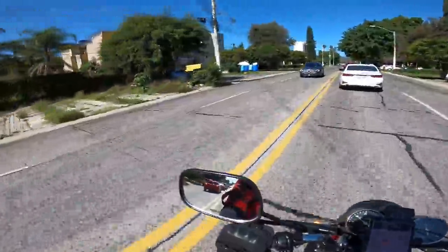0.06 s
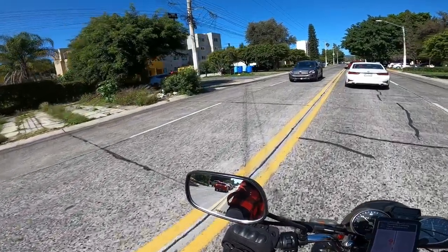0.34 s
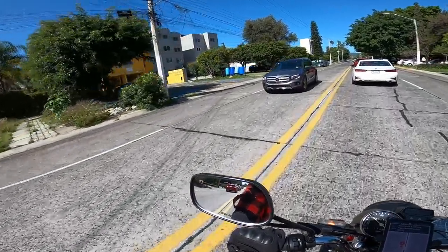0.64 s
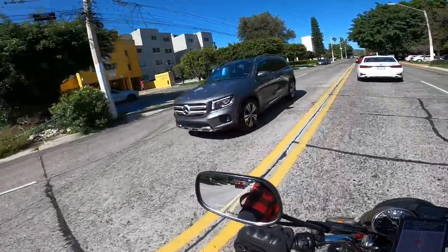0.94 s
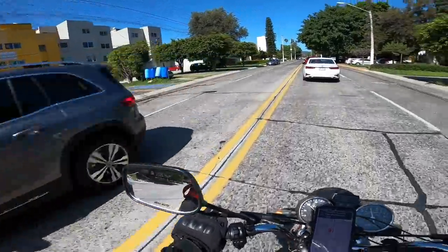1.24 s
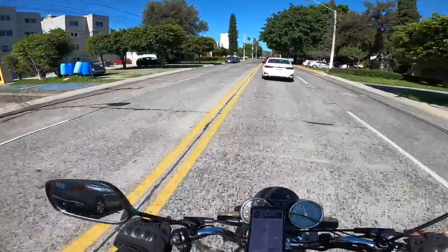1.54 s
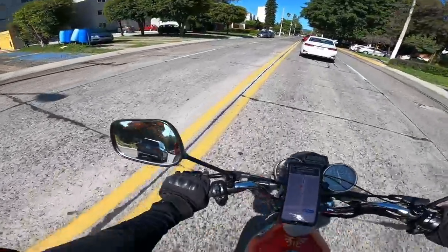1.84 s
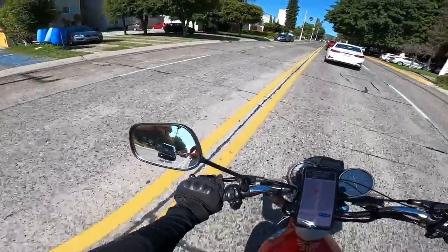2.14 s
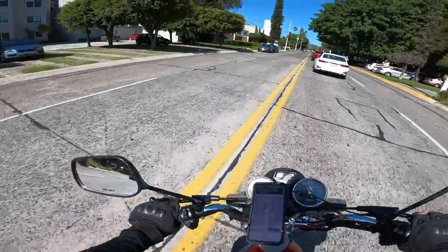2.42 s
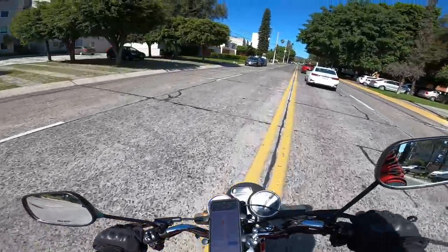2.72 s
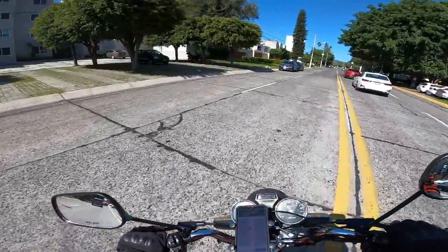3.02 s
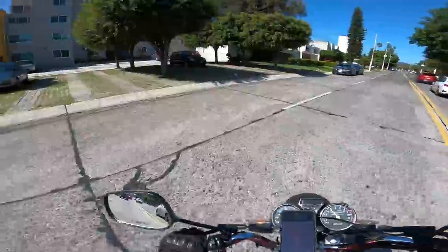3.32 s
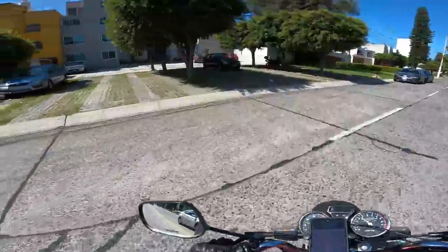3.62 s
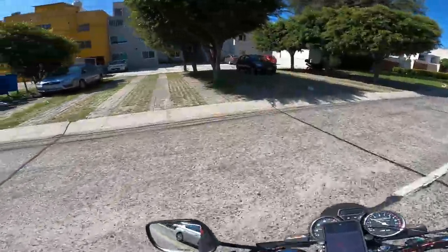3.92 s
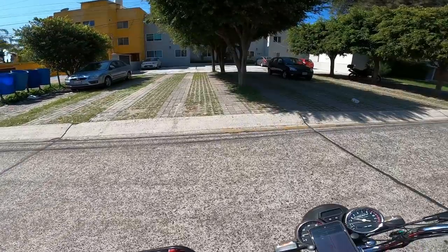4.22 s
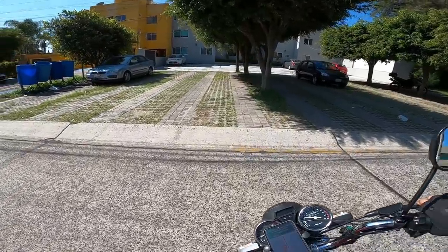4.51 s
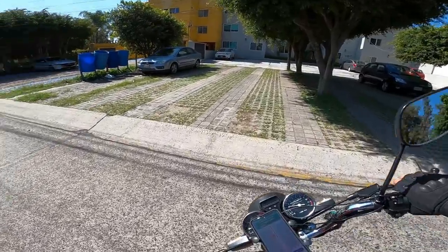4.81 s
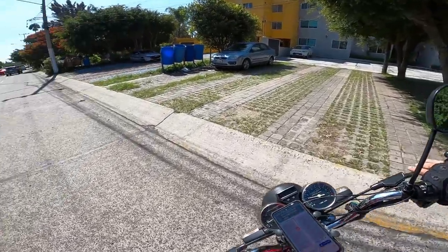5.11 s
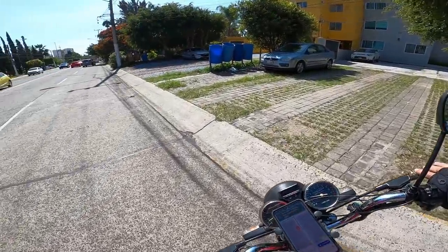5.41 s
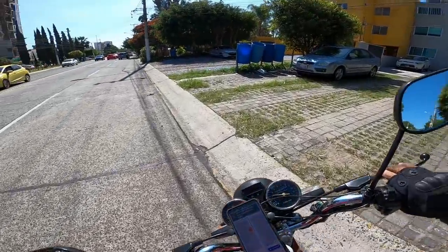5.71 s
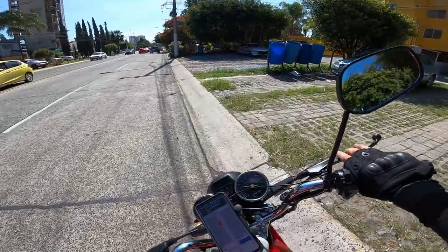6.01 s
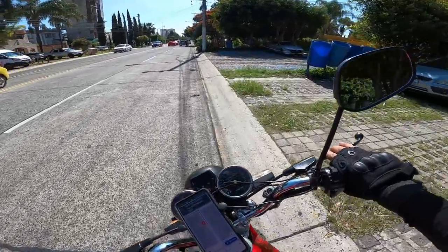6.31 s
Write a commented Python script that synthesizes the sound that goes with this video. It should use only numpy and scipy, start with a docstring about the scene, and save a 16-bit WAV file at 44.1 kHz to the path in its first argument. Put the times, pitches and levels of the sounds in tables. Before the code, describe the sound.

A single-cylinder motorcycle cruises along a street, heard from the rider's seat, with wind buffeting the microphone and tyres roaring and thumping over concrete joints. An oncoming car passes with a slap of air. The throttle shuts and the engine sinks to a slow putting idle, while the brake squeals thinly and faint high chirps come through. The engine then revs up and pulls away at a steady beat.

```python
"""A single-cylinder motorcycle, heard from the rider's seat: each firing booms in the pipe and rings
the silencer. It cruises, an oncoming car's wake slaps the microphone, the throttle shuts and the engine
sinks to idle in a slow U-turn, the brake singing thinly; then it pulls away at a steady beat.
Wind buffets the microphone, the tyres roar on the concrete and thump over its joints,
and thin, high chirps come through in the lull."""
import sys
import numpy as np
from scipy import signal
from scipy.fft import rfft, irfft, next_fast_len
from scipy.io import wavfile
from scipy.ndimage import uniform_filter1d, map_coordinates

SR = 44100
rng = np.random.default_rng(int(sys.argv[2]) if len(sys.argv) > 2 else 0)


def log_audio(samples):
    """Write samples as a 16-bit WAV file to the path given in sys.argv[1]."""
    # one column per channel
    frames = np.atleast_2d(samples).T
    # limit to full scale, then quantise
    limited = np.clip(frames, -1, 1)
    pcm = np.round(limited * 32767).astype(np.int16)
    wavfile.write(sys.argv[1], SR, pcm)


N = 280035
CRUISE_RATE = 39  # firings per second at cruising speed


def boom(cycle, rate, throttle):
    """Each firing pops and sets the gas in the pipe swinging; its note sinks as the gas cools."""
    # the sharp front of each putt: (pitch [Hz], level [dB], decay [s])
    pop_tones = [(257, -19, 0.0039), (475, -23.5, 0.02)]
    heat_lag_s, base_hz, speed_rise_hz, heat_rise_hz = 0.18, 100.9, 38.2, 35.1
    keep = np.exp(-1 / (heat_lag_s * SR))
    heat = throttle[0] + signal.lfilter([1 - keep], [1, -keep], throttle - throttle[0])
    pipe_hz = base_hz + speed_rise_hz * (rate / CRUISE_RATE) ** 2 + heat_rise_hz * heat
    # below full_rate firings a second, the boom weakens until it reaches its idle level
    full_rate, full_db, idle_db = 28.8, -19, -33.5
    boom_db = np.maximum(full_db - 0.94 * np.maximum(full_rate - rate, 0), idle_db) + 8.5 * throttle
    boom_db += 1.5 * (1 - rate / CRUISE_RATE) ** 2 * wobble(27)  # slow putts are more uneven
    muffle_hz = 126.7  # the silencer swallows the boom as its note climbs above this
    muffled_db = 53 * np.maximum(np.log2(pipe_hz / muffle_hz), 0)
    blows = firings(cycle, scatter_db=1.5) * amp(boom_db - muffled_db)
    out, t = np.zeros(N + SR), np.arange(SR // 10) / SR
    swell = t ** 0.86 * np.exp(-t / 0.0084)
    pop = sum(amp(db) * np.exp(-t / decay) * np.sin(2 * np.pi * hz * t) * 2 / np.sqrt(decay * SR)
              for hz, db, decay in pop_tones)
    for i in np.flatnonzero(blows):
        ring = swell * np.sin(2 * np.pi * pipe_hz[i] * t)
        out[i:][:len(t)] += blows[i] * (ring / np.linalg.norm(ring) + pop)
    return out[:N]


def bark(cycle, rate, throttle):
    """Each firing rings the silencer, shakes the panels and spits gas, harder with speed and throttle."""
    # the notes of the silencer and airbox: (pitch [Hz], width [Hz], level [dB])
    silencer_notes = [(200, 22, 2.5), (271.1, 7.3, 10), (319.5, 21.3, 9.5), (431.3, 45, 4.5),
                      (493, 15.4, 3), (535, 13, -7.5), (667, 33, -7.5), (784, 17, -22), (1030, 46, -6),
                      (1304, 90, -16)]
    # the buzz of the panels: (frequency [Hz], level [dB])
    panel_colour = [(150, -14), (350, 5), (600, 4), (900, 7), (1300, -32), (1900, -4), (2400, -18.5),
                    (2900, -13.5), (4200, -17.5), (8000, -32), (15700, -40)]
    # the dry spit of gas: (frequency [Hz], level [dB])
    spit_colour = [(300, -15), (600, 9.5), (1200, -2.5), (2000, -8), (2900, -8.5), (4200, -31), (8000, -43),
                   (15700, -49)]
    bark_db = -34 + 9.5 * octaves(rate / CRUISE_RATE) + 10 * throttle
    blows = firings(cycle, scatter_db=0.7)
    ringing = resonate(blows, silencer_notes)
    silencer = unit(filtered(ringing, lambda hz: 1 / (1 + 1j * hz / 1300) ** 2))  # soften the treble
    # the panels answer every firing alike, so their buzz has a pitch
    t = np.arange(SR // 12) / SR
    answer = rng.standard_normal(len(t)) * np.exp(-t / 0.035) * (1 - np.exp(-t / 0.00085))
    panels = unit(coloured(signal.fftconvolve(blows, answer)[:N], panel_colour))
    spit = noise(spit_colour) * pulses(cycle, rate, delay=0.014, decay=0.004, floor=0.15)
    return amp(bark_db) * (silencer + amp(-8) * panels + amp(-15.5) * spit)


def ticks(cycle, rate, throttle):
    """Every firing starts with a hard tick, louder as the throttle opens."""
    # the tick's tone: (frequency [Hz], level [dB])
    tick_colour = [(900, -15), (1600, -6), (3000, 1), (4200, -17.5), (7000, -18), (15000, -49)]
    edge = pulses(cycle, rate, delay=0.005, decay=0.005, floor=0.02)
    return amp(-75 + 16 * throttle) * edge * noise(tick_colour)


def valve_gear(cycle, rate):
    """Two valves keep the cylinder's fins ringing in a whine, over a pulsing hiss of air drawn into the engine."""
    # the ringing fins: (pitch [Hz], level [dB], pitch scatter [Hz])
    fin_notes = [(3470, 1.5, 58), (3970, -11.5, 19), (4320, -26, 30), (6830, -16, 55), (7750, -23, 45),
                 (9507, -20, 60), (10309, -23, 50)]
    # how their ringing changes: (time [s], level [dB], pitch shift [Hz])
    ring_changes = [(0, -44.5, 0.5), (1.3, -46, -0.5), (1.42, -47.5, -66), (1.75, -47.5, -60),
                    (2.05, -59, -50.5), (3.5, -68, -50.5), (5.3, -78, -52), (5.92, -51.5, -49.5),
                    (6.35, -63, -56)]
    # the hiss near 6 kHz and the finer fizz: (time [s], level [dB])
    hiss_levels = [(0, -53), (.45, -50.5), (.6, -50), (1.3, -48.5), (1.35, -55), (1.55, -55.5), (2.1, -65),
                   (2.5, -52.5), (3.05, -60.5), (3.4, -57), (5.2, -55.5), (5.85, -51), (6.35, -65)]
    fizz_levels = [(0, -48.5), (.8, -50), (1.3, -47), (1.9, -50), (2.5, -49), (3.1, -49.5), (3.7, -58),
                   (4.4, -63), (5.3, -59), (5.6, -49.5), (6.35, -52)]
    # their tone: (frequency [Hz], level [dB])
    hiss_colour = [(4500, -29), (5500, -8), (5850, 5.5), (6080, 2.5), (6450, -5), (7500, -18), (9000, -31)]
    fizz_colour = [(1500, 12.5), (3000, 12.5), (4000, 11.5), (5000, 3), (7300, 5.5), (9000, -3.5),
                   (10500, -2.5), (12200, -10), (13200, -9), (15700, -25)]
    hiss_db, = curves(hiss_levels)
    fizz_db, = curves(fizz_levels)
    ring_db, shift_hz = curves(ring_changes)
    valves = pulses(cycle, rate, delay=0.0065, decay=0.0069, floor=0.7)
    valves += 0.59 * pulses(cycle, rate, delay=0.45, decay=0.0038, floor=0.99)
    fins = sum(amp(db) * tone(hz + shift_hz + scatter * wobble(320)) for hz, db, scatter in fin_notes)
    ring = amp(ring_db) * unit(fins * uniform_filter1d(valves, size=70) ** 1.7)
    depth = (rate / CRUISE_RATE) ** 2  # the pulsing deepens with engine speed
    throb = 1 - depth + depth * pulses(cycle, rate, delay=0.4, decay=0.006, floor=0.67)
    hiss = amp(hiss_db) * noise(hiss_colour) * throb
    fizz = amp(fizz_db) * noise(fizz_colour) * unit(depth * valves + 0.56)
    return ring + (hiss + fizz) * amp(wobble(30))


def brake():
    """The pad on the disc makes a dull rub and one high, fluttering note."""
    # the thin squeal at walking pace: (time [s], pitch [Hz], level [dB])
    squeal_changes = [(3.1, 6100, -72), (3.3, 6090, -56.5), (4.25, 6010, -60.5), (4.45, 5790, -59),
                      (4.72, 5720, -50), (4.93, 6010, -48), (5.1, 6000, -53), (5.3, 6080, -71)]
    hz, db = curves(squeal_changes)
    waver_hz = 65 * wobble(350)
    squeal = amp(db + 4.5 * wobble(70)) * tone(hz + waver_hz)
    pad = [(1100, 310, 0)]  # (pitch [Hz], width [Hz], level [dB])
    rub = unit(resonate(resonate(rng.standard_normal(N), pad), pad))
    return squeal + amp(-42.5) * hump(s=3.73, spread=0.43) * rub


def knocks():
    """Slack in the running gear knocks while the bike coasts."""
    # the small knocks: (time [s], level [dB])
    hits = [(3.5194, -51.5), (3.6597, -48.5), (3.9495, -44), (4.1094, -53), (4.649, -46), (5.0394, -46),
            (5.108, -41.5)]
    # their tone: (frequency [Hz], level [dB])
    knock_colour = [(500, -14), (1500, 3), (3500, -3), (6000, -8), (11000, -20), (15000, -29)]
    strikes = np.zeros(N)
    for s, db in hits:
        age = clock() - s
        strikes += amp(db) * (age > 0) * np.exp(-abs(age) / 0.0098)
    return strikes * noise(knock_colour)


def bumps():
    """Each joint in the road gives the bike's frame one dull thump, never quite the same."""
    # the wheels hit joints in the concrete: (time [s], level [dB])
    joints = [(.692, -19.5), (1.547, -18.5), (1.856, -18), (1.886, -12.5), (2.005, -11.5), (3.185, -14),
              (3.237, -17), (4.501, -25), (4.644, -28), (4.723, -23.5), (4.858, -23), (4.886, -24),
              (4.957, -20.5), (4.991, -24)]
    # the frame's low notes: (pitch [Hz], level [dB], decay [s])
    frame_notes = [(86, 10.5, 0.016), (151, 3.5, 0.015), (236, -3.5, 0.022), (303, -5, 0.0063)]
    out, t = np.zeros(N + SR), np.arange(SR // 8) / SR
    for s, db in joints:
        detunes = np.exp(.08 * rng.standard_normal(len(frame_notes)))
        thump = sum(amp(level) * np.exp(-t / decay) * np.sin(2 * np.pi * hz * detune * t)
                    for (hz, level, decay), detune in zip(frame_notes, detunes))
        out[round(s * SR):][:len(t)] += amp(db) * thump * (1 - np.exp(-t / 0.0042))
    return out[:N]


def tyres(pace):
    """Rubber roars on rough concrete: the bike's own tyres, and the oncoming car's as it passes."""
    # the roar's tone: (frequency [Hz], level [dB])
    roar_colour = [(200, 10), (450, -2.5), (800, 1), (1200, -1.5), (1700, -9.5), (2400, -21), (4000, -29),
                   (9000, -34), (15700, -51)]
    nearest_s, passing_s = 1.2, 0.16
    bike = amp(-35.5 + 2 * octaves(pace))
    car = amp(-29.5) / np.hypot(1, (clock() - nearest_s) / passing_s)
    return np.hypot(bike, car) * amp(1.06 * wobble(25)) * noise(roar_colour)


def wind(pace, intake):
    """Swirls thump the microphone and roughen the rush of air, more so with pace; gusts slap it."""
    # the low thumping and the rushing air: (frequency [Hz], level [dB])
    thump_colour = [(2, -40), (7, 16.5), (15, 8.5), (30, 5.5), (60, 4.5), (100, 1), (170, -6.5), (300, -17)]
    rush_colour = [(60, -67), (160, -2), (280, -3.5), (500, -7), (900, -18), (1600, -24), (2500, -38),
                   (5000, -85), (12000, -62)]
    # swells and lulls in the thumping: (time [s], level change [dB], spread [s])
    swells = [(0.72, 5.5, 0.017), (1.035, 4, 0.042), (1.284, 8.5, 0.046), (1.398, -8, 0.059),
              (3.231, 4.5, 0.073), (4.517, 4.5, 0.023), (4.89, 1.5, 0.08), (5.25, 0.5, 0.16),
              (5.571, 4, 0.031)]
    # slaps of churning air: (time [s], level [dB], spread [s], bright edge [Hz])
    gusts = [(0.695, -17.5, 0.0049, 770), (1.032, -17.5, 0.017, 1690), (1.06, -20.5, 0.016, 1700),
             (1.101, -22.5, 0.017, 915), (1.16, -23, 0.042, 800), (1.285, -20.5, 0.0091, 1200),
             (2.007, -21, 0.002, 1510), (2.037, -21, 0.03, 780), (2.17, -29, 0.12, 1160)]
    buffet_db = -16 + 6 * octaves(pace) + sum(db * hump(s, spread) for s, db, spread in swells)
    rush_db = -32 + 9.5 * octaves(pace) + 13.5 * intake  # the engine sucking in air adds to the rush
    swirls = wobble(35)
    thumps = noise(thump_colour)
    deep = filtered(thumps, lambda hz: 1 / (1 + (hz / 45.7) ** 2))
    buffet = amp(buffet_db + 0.42 * swirls) * (deep + pace * (thumps - deep))  # duller when slow
    rush = amp(rush_db + 1.2 * swirls + 1.8 * wobble(110)) * noise(rush_colour)
    slaps = np.zeros(N)
    for s, db, spread, edge_hz in gusts:
        colour = [(80, -12), (220, 0), (edge_hz, -9), (2 * edge_hz, -25), (5 * edge_hz, -55)]
        slaps += amp(db) * hump(s, spread) * noise(colour)
    return buffet + rush + slaps * amp(1.8 * wobble(140))


def chirps():
    """Short, thin, rising chirps with a ragged pitch, among flurries of fainter ones."""
    # the clearest chirps: (time [s], level before clear_gain_db [dB], pitch [Hz])
    clear_chirps = [(2.4084, -42, 7790), (2.6788, -42, 7560), (2.798, -44, 7680), (2.955, -43.5, 7300),
                    (3.1138, -40.5, 6960), (3.2276, -43, 7640), (3.3777, -44, 7080), (3.5094, -45, 8200),
                    (3.6192, -40, 7890), (3.789, -44, 7790), (3.8985, -42.5, 8270), (4.0557, -38.5, 7510),
                    (4.2094, -41, 6930), (4.335, -41, 7200), (4.4694, -43, 7930), (4.6069, -40.5, 7140),
                    (4.7494, -46, 7210), (4.8778, -43, 7500), (5.024, -44, 6940), (5.1587, -47, 7560),
                    (5.3073, -44, 7000), (5.443, -42, 7370), (5.5694, -40, 6800), (5.7099, -46, 7360)]
    # the flurries: (middle [s], half length [s], top level [dB], lowest [Hz], highest [Hz], chirps [1/s])
    flurries = [(4.15, 1.04, -50.5, 7800, 8500, 24), (4.3, 1.03, -54, 6700, 7300, 46),
                (4.8, 0.49, -55, 4500, 5700, 45), (4.8, 1, -67, 10500, 12300, 47)]
    clear_gain_db, faint_spread_db, typical_length_s = -7, 8, 0.027
    out, t = np.zeros(N + SR), np.arange(SR // 20) / SR
    clear = [(s, db + clear_gain_db, hz) for s, db, hz in clear_chirps]
    faint = [(middle + half * (2 * when - 1), db - faint_spread_db * weak, low + (top - low) * high)
             for middle, half, db, low, top, density in flurries
             for when, weak, high in rng.random(size=(200, 3))[:int(2 * half * density)]]
    for s, db, hz in clear + faint:
        length = typical_length_s * np.exp(.2 * rng.standard_normal())
        ragged = unit(uniform_filter1d(rng.standard_normal(len(t)), size=20))
        pitch = hz * (1 + .025 * (t / length - .5) + .04 * ragged)
        swell = np.sin(np.pi * np.minimum(t / length, 1) ** 0.55)
        out[round(s * SR):][:len(t)] += amp(db) * swell * tone(pitch)
    return out[:N]


def firings(cycle, scatter_db):
    """One blow per engine cycle, each a little different; the average power is about 1 at any speed."""
    at = np.flatnonzero(np.diff(np.floor(cycle)) > 0)
    blows = np.zeros(N)
    blows[at] = amp(scatter_db * rng.standard_normal(512)[:len(at)]) / np.sqrt(np.diff(cycle)[at])
    return blows


def pulses(cycle, rate, delay, decay, floor):
    """A level that jumps `delay` cycles after each firing and falls back over `decay` seconds."""
    age = (cycle - delay) % 1 / rate
    burst = np.exp(-age / decay) * (1 - np.exp(-age / 0.00061))
    return unit(floor + burst / np.sqrt(rate * decay / 2))


def amp(db):
    """Turn decibels into a factor to multiply by."""
    return 10 ** (np.asarray(db) / 20)


def unit(x):
    """Scale x to an average power of 1."""
    return x / np.sqrt(np.mean(x ** 2) + 1e-20)


def octaves(share):
    """How many times a speed has doubled over its cruising value."""
    return np.log2(np.maximum(share, 1e-3))


def clock():
    """The time of every sample, in seconds."""
    return np.arange(N) / SR


def curves(rows):
    """Join a table's points with straight lines: one curve for each column after the time."""
    times, *columns = np.transpose(rows)
    return [np.interp(clock(), times, column) for column in columns]


def hump(s, spread):
    """A smooth swell of height 1 around the time s."""
    return np.exp(-.5 * ((clock() - s) / spread) ** 2)


def wobble(rate):
    """A smooth curve through `rate` random points a second."""
    return map_coordinates(rng.standard_normal(1024), [clock() * rate], mode="mirror")


def tone(hz):
    """A sine wave that follows a changing pitch."""
    return np.sin(2 * np.pi * np.cumsum(hz) / SR)


def noise(colour):
    """Noise of power 1, shaped by (frequency [Hz], level [dB]) points."""
    return unit(coloured(rng.standard_normal(N), colour))


def coloured(x, colour):
    """Shape x by (frequency [Hz], level [dB]) points and cut everything outside them."""
    f, db = np.transpose(colour)
    return filtered(x, lambda hz: amp(np.interp(np.log(hz + 1), np.log(f), db))
                    * (hz > f[0]) * (hz < f[-1]))


def resonate(x, notes):
    """Let x ring a set of (pitch [Hz], width [Hz], level [dB]) notes."""
    return filtered(x, lambda f: sum(amp(db) * 1j * f * width / (hz * hz - f * f + 1j * f * width)
                                     for hz, width, db in notes))


def filtered(x, response):
    """Multiply each frequency in x by response(frequency)."""
    size = next_fast_len(N + SR // 2)
    return irfft(rfft(x, size) * response(np.fft.rfftfreq(size, 1 / SR)), size)[:N]


def scene():
    """Engine speed, throttle and pace drive the bike and the air around it."""
    # engine speed: (time [s], firings [1/s])
    engine_speed = [(0, 38.75), (1.2, 38.9), (1.4, 36.5), (1.75, 37.25), (2.1, 34.7), (2.85, 28.9),
                    (3.1, 24.8), (3.35, 22.1), (4, 10.5), (5.15, 9.9), (5.6, 27.4), (5.75, 28.8),
                    (6.35, 27.8)]
    # the twist grip: (time [s], opening [0-1])
    twist_grip = [(0, 0.26), (.7, 0.66), (1.2, 0.23), (1.35, 0.1), (3.58, 0.12), (3.68, 0.3), (3.82, 0.02),
                  (5.06, 0), (5.2, 0.62), (5.45, 0.99), (5.8, 0.42), (6.35, 0.99)]
    # pace over the road: (time [s], share of cruising speed [0-1])
    road_pace = [(0, 0.98), (2, 0.94), (3.15, 0.66), (4, 0.45), (4.7, 0.45), (5.2, 0.47), (6.35, 0.61)]
    rate, = curves(engine_speed)
    throttle, = curves(twist_grip)
    pace, = curves(road_pace)
    cycle = np.cumsum(rate) / SR  # counts up by one for each firing
    intake = throttle * (rate / CRUISE_RATE) ** 4
    exhaust = boom(cycle, rate, throttle) + bark(cycle, rate, throttle)
    engine = exhaust + ticks(cycle, rate, throttle) + valve_gear(cycle, rate)
    return (engine + brake() + knocks() + bumps() + tyres(pace) + wind(pace, intake) + chirps())[None]


def record(dry):
    """The sound starts and ends softly, and its highest treble is cut off."""
    fade_s, top_hz = .004, 15700
    edges = np.minimum(np.minimum(clock(), clock()[::-1]) / fade_s, 1)
    return filtered(dry[0] * edges, lambda hz: hz < top_hz)[None]


dry = scene()
out = record(dry)
log_audio(out)
```